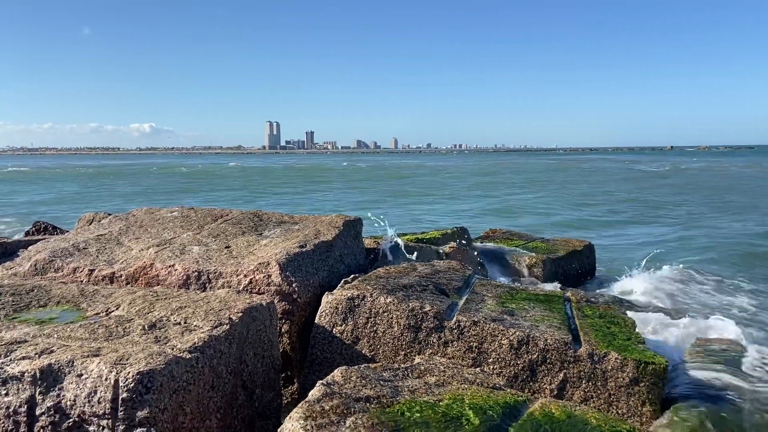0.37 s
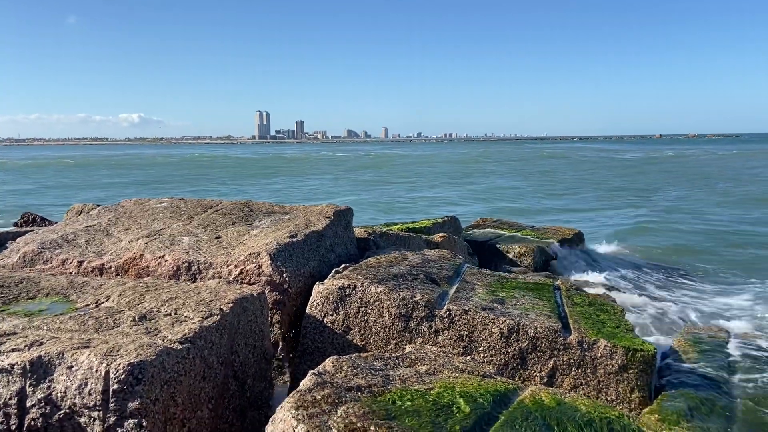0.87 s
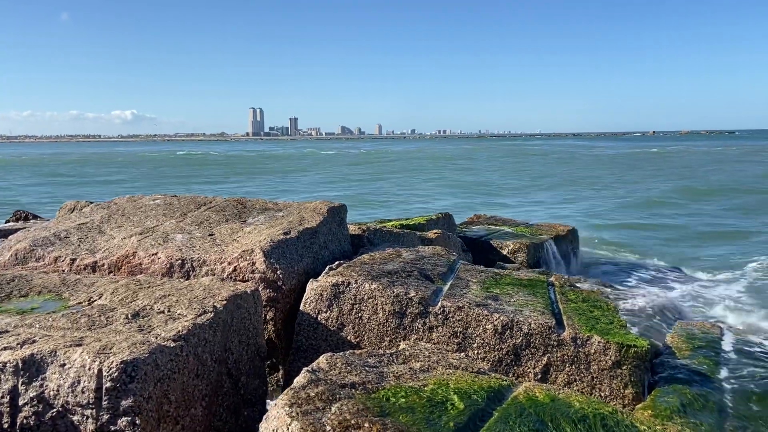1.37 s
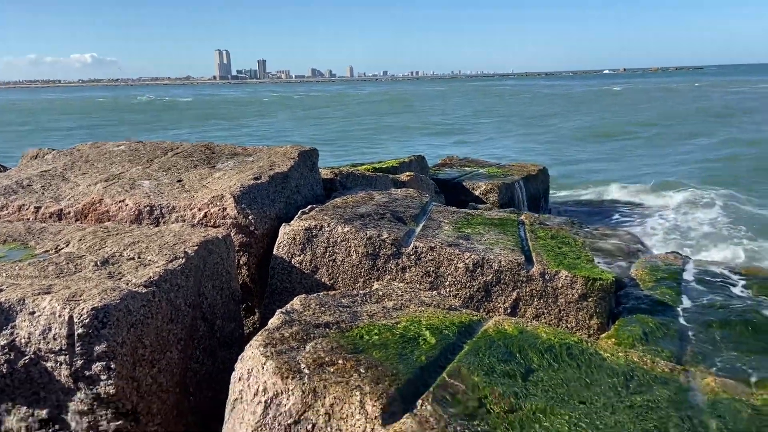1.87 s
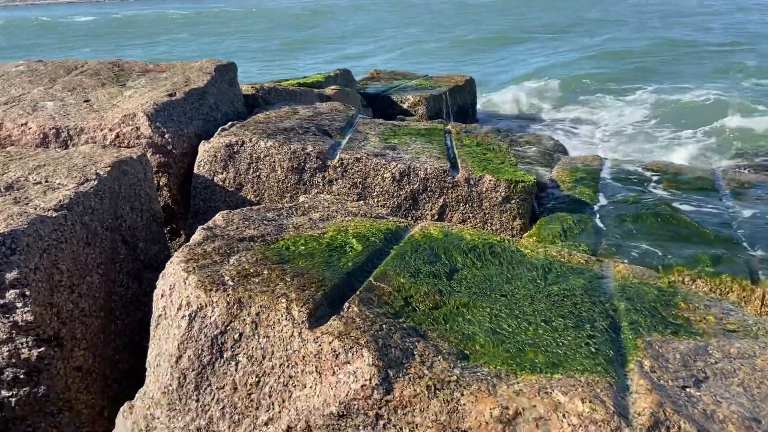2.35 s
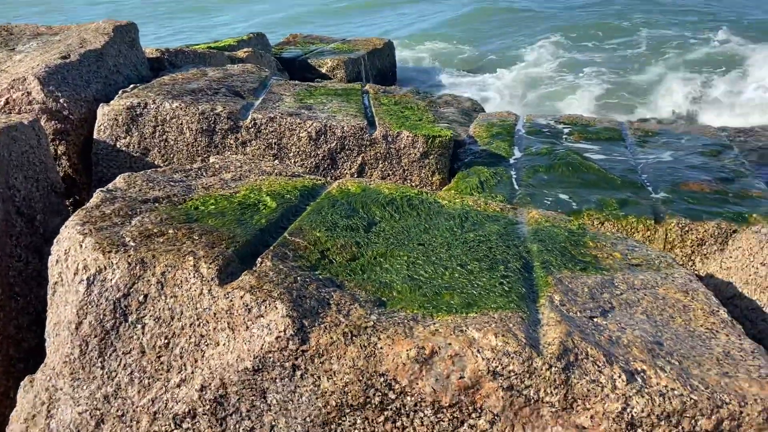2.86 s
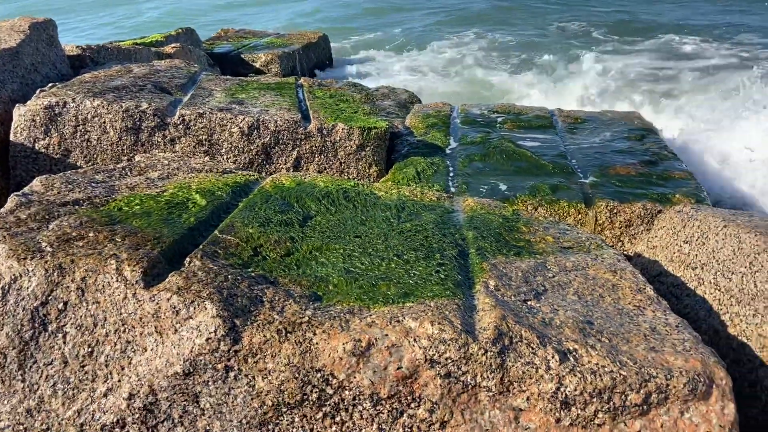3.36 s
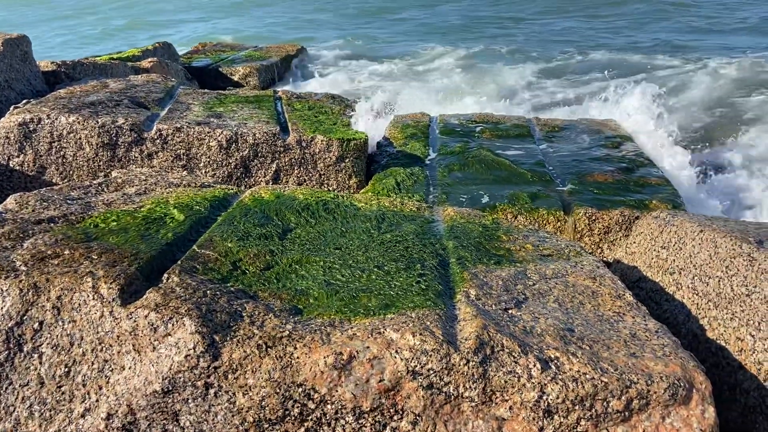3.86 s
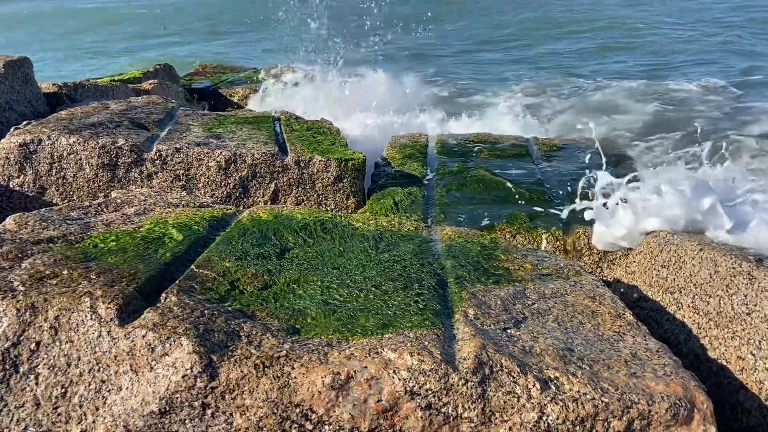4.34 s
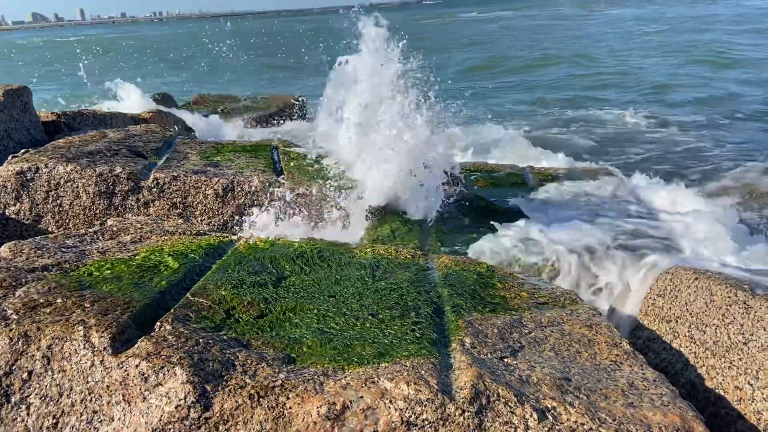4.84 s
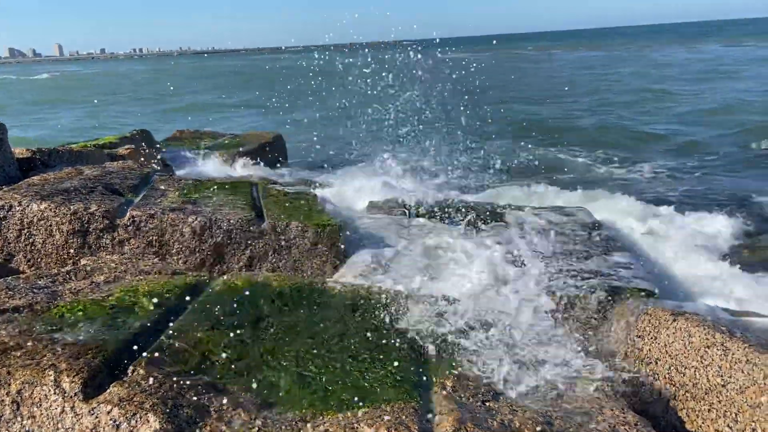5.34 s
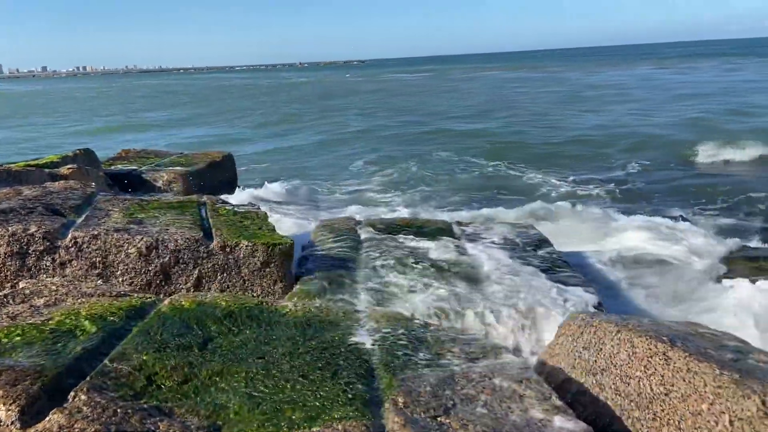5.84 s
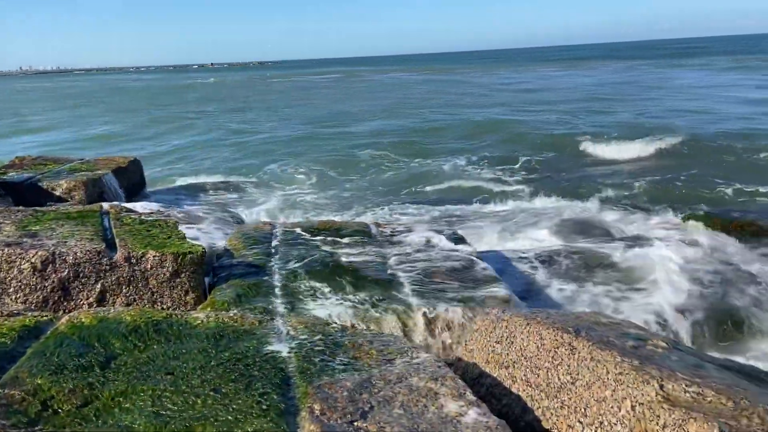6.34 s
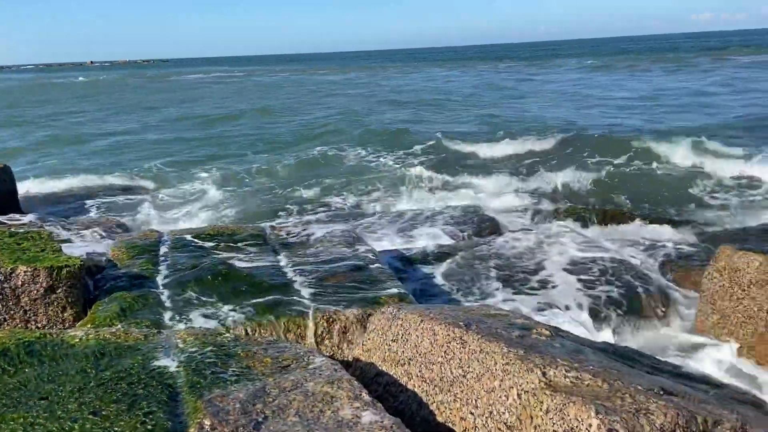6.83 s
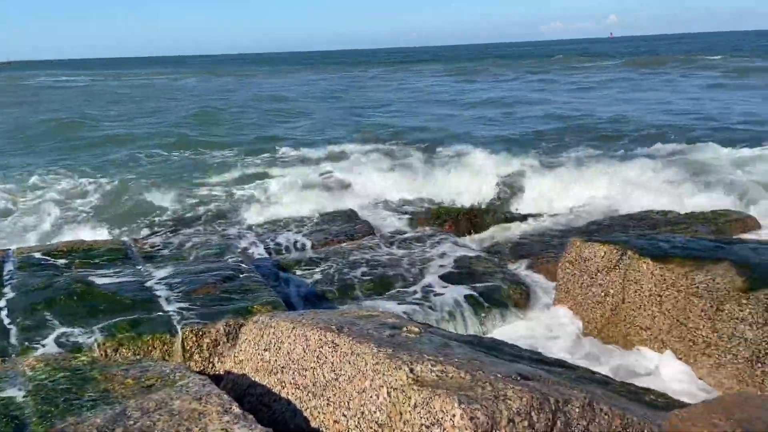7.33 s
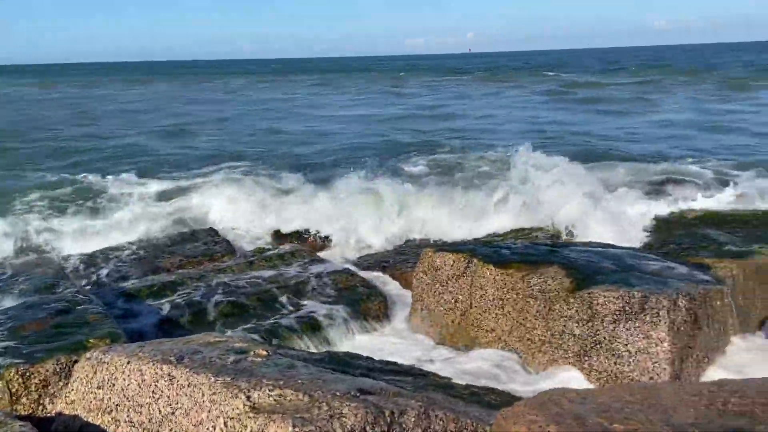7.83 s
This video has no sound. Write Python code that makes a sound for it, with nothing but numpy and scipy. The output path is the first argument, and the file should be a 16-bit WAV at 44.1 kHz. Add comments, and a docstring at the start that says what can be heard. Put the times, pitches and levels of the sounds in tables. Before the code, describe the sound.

On an open rocky jetty, surf hisses continuously in wide stereo, with faint spray patter and occasional bubbly gulps between the blocks. Strong wind hits the unprotected microphone throughout in short irregular bursts of low rumble, flutter and crackle, with thumps and sharp pops. Splashing brightens midway, peaks a little after five seconds, then eases into a broader wash as the wind keeps knocking.

```python
"""A rocky shore: waves wash over and splash against rock blocks while a strong gusty wind buffets two ports.
The surf is a wide hiss of random short-time spectra, with noise puffs and rising pings of falling spray
and the rings of air pockets. The wind is noise and small eddies in lumps, heard as rumble, flutter and
crackle, with soft thumps and sharp pops: pressure kicks dispersed so that they slide from high to low."""
import sys
import numpy as np
from scipy import signal
from scipy.fft import rfft, irfft, next_fast_len
from scipy.io import wavfile
from scipy.ndimage import uniform_filter1d

SR = 44100
rng = np.random.default_rng(int(sys.argv[2]) if len(sys.argv) > 2 else 0)


def attenuation_scalar(level_db):
    """Turn a level in dB into a linear amplitude multiplier (20 dB per decade)."""
    decades = np.asarray(level_db, float) / 20
    return 10 ** decades


def transcribe(u):
    """Save the signal u as a 16-bit wav file named by the first command-line argument.

    u: samples, shape (n,) or (channels, n), limited to [-1, 1]; the rate is SR.
    q: integer samples, one column per channel.
    """
    v = np.clip(np.atleast_2d(u).T, -1, 1)
    q = np.round(v * 32767).astype(np.int16)
    wavfile.write(sys.argv[1], SR, q)


N = 350595

# Water breaking on the near blocks, only its changes count: (time [s], spray hiss level [dB])
SURF_HISS = [(0.0, -38), (0.3, -39), (0.65, -40.5), (1.2, -41), (1.4, -39.5), (1.7, -41), (2.0, -39.5),
             (2.35, -40), (2.6, -37), (2.8, -38), (3.15, -34), (3.4, -38), (3.6, -35), (3.8, -38.5),
             (4.05, -36), (4.4, -38.5), (4.7, -36), (5.0, -38), (5.13, -35.5), (5.21, -34), (5.38, -32),
             (5.46, -36), (5.58, -33), (5.66, -36), (5.78, -35.5), (5.86, -38.5), (5.95, -40), (7.0, -41.5),
             (7.4, -39.5), (7.95, -39.5)]
# Waves tumbling farther out, heard in the body of the wash: (time [s], relative level [dB])
FAR_BREAKERS = [(0.0, 2.5), (0.35, 3), (0.65, 1.2), (2.3, 0), (4.4, -1), (5.0, 0.5), (5.23, 2), (5.5, -1.5),
                (5.8, 1.5), (6.0, -0.5), (6.6, 2.7), (7.0, 0.6), (7.4, 1.5), (7.95, 2.2)]
# Spectrum of the wash: (frequency [Hz], relative level [dB])
WASH_SPECTRUM = [(60, -30), (200, 3), (500, 8), (900, 9), (1500, 6.5), (2500, 2.5), (4000, -2), (5200, -1),
                 (6500, -4), (8000, -8.5), (11000, -11.5), (16000, -14.5)]
# Likeness of the wash at the two ports: (frequency [Hz], share [1 = alike])
WASH_LIKENESS = [(200, 1), (700, 0.62), (1800, 0.38), (3000, 0.27), (3900, 0.65), (5300, 0.52),
                 (6300, 0.58), (7200, 0.72), (8200, 1)]
# Drift of the left-right phase as the breakers move about: (frequency [Hz], rms phase [rad])
PHASE_WANDER = [(200, 1), (700, 0.24), (1800, 1.0), (3000, 0.35), (3900, 0), (5300, 1.0), (6300, 0.33),
                (7200, 0.73), (8200, 0.2)]
# Lead of the right port over the left: (frequency [Hz], lead [cycles])
RIGHT_LEAD = [(0, 0), (1500, .45), (2700, .85), (3800, .99), (5500, 1.5), (6400, 1.99), (7200, 2.01),
              (8900, 2.5), (11050, 3.0), (15200, 4.0), (19400, 5.0)]
# Big drops of spray slapping the rock: (time [s], relative level [dB])
SPRAY_SLAPS = [(4.7364, -29), (4.7716, -28), (4.812, -25), (5.3009, -32), (5.4685, -28), (5.665, -32),
               (5.7448, -47)]
# Air pockets gulped by the water between the blocks: (time [s], relative level [dB], nominal pitch [Hz])
AIR_POCKETS = [(0.4279, -29, 1630), (0.9238, -14, 1520), (1.4306, -20, 1460), (3.0629, -18, 1380),
               (3.366, -26, 1360), (3.857, -22, 1340), (5.2091, -28, 1620), (5.2999, -16, 2150),
               (5.3388, -24, 2390), (5.696, -25, 2430), (5.8561, -26, 1560), (6.976, -12, 1920),
               (7.3881, -28, 1950), (7.7059, -30, 1400), (7.7832, -27, 1610)]
# Steady strength of the wind between buffets: (time [s], level [dB])
STEADY_WIND = [(0.0, -24), (2.45, -24.5), (2.74, -15.5), (3.32, -34), (3.92, -29), (4.49, -26), (4.98, -28),
               (5.78, -24.5), (6.11, -22.5), (6.6, -14.5), (7.84, -25), (7.95, -11)]
# Moments when the steady wind drops out: (centre [s], half width [s], depth [dB])
WIND_LULLS = [(0.05, 0.036, -4), (1.03, .05, -5.5), (1.79, 0.028, -17), (2.47, 0.037, -8),
              (2.76, 0.026, -12), (3.175, .025, -14), (3.59, .02, -8), (3.86, .02, -10), (4.2, .02, -6),
              (4.565, 0.022, -10), (5.5, 0.02, -16), (5.73, .07, -12), (6.61, 0.027, -18),
              (7.09, 0.017, -12), (7.6, .02, -8), (7.86, .025, -6)]
# Buffets on the ports: (start [s], length [s], strength [dB], fineness [dB of flutter over rumble])
WIND_BUFFETS = [(0.101, 0.064, -20, 4), (0.211, 0.07, -26, 3), (0.45, 0.069, -27.5, -3),
                (0.589, 0.047, -17.5, -2), (0.793, 0.042, -22, -6.5), (1.092, 0.039, -17, -6),
                (1.165, 0.114, -25.5, -2), (1.268, 0.052, -24, -1), (1.39, 0.056, -23.5, 0),
                (1.523, 0.091, -21, -7.5), (1.677, 0.033, -31, -12), (1.834, 0.027, -17, -3),
                (1.924, 0.023, -22, -14), (1.984, 0.054, -18, -7), (2.104, 0.036, -21, -11),
                (2.19, 0.043, -34, -1), (2.25, 0.07, -32, -12), (2.362, 0.049, -17, -8.5),
                (2.523, 0.047, -13.5, -1), (2.794, 0.021, -18.5, -17), (2.843, 0.044, -20, -1),
                (2.941, 0.075, -17, -5.5), (3.046, 0.086, -21.5, -7.5), (3.211, 0.09, -16, -6),
                (3.328, 0.096, -19.5, -8), (3.49, 0.051, -19.5, -5), (3.634, 0.047, -16.5, 7),
                (3.683, 0.04, -25, -12), (3.764, 0.042, -18.5, 9), (3.897, 0.051, -16, 4.5),
                (4, 0.11, -19.5, 4), (4.15, 0.054, -27.5, -12), (4.231, 0.096, -16.5, -5),
                (4.39, 0.08, -25.5, -4.5), (4.6, 0.082, -23, 7), (4.761, 0.054, -20, 10.5),
                (4.783, 0.074, -35, -3), (4.893, 0.093, -28, 0), (5.018, 0.065, -28.5, 7),
                (5.095, 0.054, -23.5, 7), (5.144, 0.059, -23, -11), (5.32, 0.1, -31, -11),
                (5.436, 0.03, -22, -0.5), (5.836, 0.039, -18, -1.5), (5.95, 0.071, -22, 2.5),
                (6.13, 0.028, -19.5, 4), (6.247, 0.041, -25, -7), (6.33, 0.086, -23, 8.5),
                (6.428, 0.1, -24.5, 7), (6.641, 0.075, -21.5, 3), (6.733, 0.072, -24, 8),
                (6.923, 0.035, -17, -9), (6.96, 0.044, -22.5, 7), (7.185, 0.049, -15, -4),
                (7.266, 0.04, -22.5, -6), (7.317, 0.051, -24.5, -13), (7.355, 0.072, -15, -4),
                (7.49, 0.088, -21, -4), (7.64, 0.042, -28, 5), (7.716, 0.086, -13, -5),
                (7.884, 0.089, -18.5, -5)]
# Spectrum of the lowest wind layer: (frequency [Hz], relative level [dB])
RUMBLE_SPECTRUM = [(15, 3), (30, -6.5), (55, 6), (100, 3), (200, -9.5), (400, -19), (800, -82)]
# Spectrum of the middle wind layer: (frequency [Hz], relative level [dB])
FLUTTER_SPECTRUM = [(60, -1.5), (150, 4), (300, 1), (500, -3.5), (800, -14.5), (1500, -51)]
# Spectrum of the highest wind layer: (frequency [Hz], relative level [dB])
CRACKLE_SPECTRUM = [(200, -51), (450, -3), (700, 2), (1000, 0.5), (1500, -11.5), (2500, -23.5), (5000, -76)]
# Likeness of the wind at the two ports: (frequency [Hz], share [1 = alike])
WIND_LIKENESS = [(40, 0.77), (150, 0.69), (330, 0.5), (600, 0.12), (1000, 0.024)]
# Soft heavy thumps where a large eddy presses both ports: (time [s], level [dB])
EDDY_THUMPS = [(0.611, -14.5), (2.535, -7), (2.79, -15), (3.091, -12.5), (7.221, -8), (7.72, -20)]
# Sudden eddies on the ports:
# (time [s], level [dB], sharpness [dB, more crackle and less thump], left over right [dB])
EDDY_POPS = [(0.814, -10.5, 0.1, 6), (1.103, -14, 2, -0.5), (1.2, -13, 0.1, 6), (1.614, -12.5, -9, 2),
             (1.711, -10.5, -2, -3), (1.818, -20, -2, 0.0), (1.934, -10, -11, 4), (2.111, -14, 6, 2),
             (2.528, -2, -5, 0), (2.586, -7.5, -11, 5), (2.851, -7.5, -15, 13), (2.939, -18.5, 8.5, -0.5),
             (3.095, -13.5, -2, -0.5), (3.219, -9.5, 4.5, 1), (3.324, -15, 1, 5), (3.346, -17, 0.1, -8),
             (3.407, -18, 8, 0), (3.426, -11, 4, 1), (3.636, -9.5, 7.5, 0.0), (3.764, -26, -7, -0.5),
             (3.783, -4.5, -4, 4), (3.813, -19, -1, 7), (3.863, -16.5, 6.5, 3), (3.898, -33, -2, -2.0),
             (3.92, -11, -6, -3), (4.031, -5, -8, 5.5), (4.088, -7, 0.1, 1), (4.173, -23, 4, 0.5),
             (4.302, -4.5, 0.5, -2), (4.752, -13, -6, 5), (5.046, -15, 5, 1), (5.117, -8.5, 5, -2),
             (5.978, -12, 2, 3), (6.072, -14, 1, 1.5), (6.124, -17, 2, -2), (6.178, -7, -4, 0),
             (6.269, -11.5, -8, 3), (6.297, -16, -6, 0.5), (6.343, -13, 3, -1), (6.437, -11, -6, -4),
             (6.454, -11, 2, -3), (6.636, -9, -5, 2), (6.67, -12.5, 5, -2), (6.711, -18.5, 0.1, 4),
             (6.782, -6.5, 5.5, 1), (6.807, -5.5, 7, 0), (6.913, -18, -18, 1), (6.929, -9.5, -4, 9),
             (7.018, -11, 2.5, -3), (7.032, -4, -1, 3), (7.166, -11.5, 1, -4), (7.217, -12, -1, 5),
             (7.479, -23, -5, -1.5), (7.547, -6.5, -11.5, -1), (7.656, -13, -10, 0)]
# Edge below which both sides sound the same: (time [s], frequency [Hz])
MONO_EDGE = [(0, 334), (1.0, 323), (1.3, 245), (2.6, 219), (3.1, 128), (3.5, 70), (4.0, 25), (7.95, 25)]
# Hollow in the centre of the image at first: (centre [Hz], width [Hz], level [dB], end [s])
CENTRE_HOLLOW = (663, 127, -6, 1.35)

BODY_FOLLOWS = 0.6  # dB that the body of the wash gains per dB of hiss
RISE_DB_PER_S, FALL_DB_PER_S = 435, 364  # swell of a buffet before its start, decay after its end
STEADY_RUMBLE_DB, STEADY_FLUTTER_DB = -4.5, -9  # the steady wind's share in each layer
RUMBLE_DB, FLUTTER_DB = -5, -3.5  # a buffet's share in each layer at fineness 0
CRACKLE_DB, CRACKLE_FOLLOWS = -35.5, 0.49  # crackle at a flutter of -30 dB, and dB gained per dB of flutter
RUMBLE_LAG_S = 0.016  # the bass of the wind arrives after its flutter
THUMP_DB, FLAP_DB, SNAP_DB = -20, -2.5, -3.5  # low, middle and high part of a pop at sharpness 0
RAGGED = 0.14  # share of a pop's ragged tail
POP_DELAY_S = 0.003  # delay of every pop after its listed time


def evened(x):
    """Normalisation: scales to rms 1."""
    return x / np.sqrt(np.mean(x ** 2) + 1e-20)


def read(points, hz):
    """Interpolation of a spectrum table on a logarithmic frequency axis."""
    f, value = np.transpose(points)
    return np.interp(np.log(hz + 1), np.log(f + 1), value)


def lumps(hz):
    """Band-limited random modulation of rms 1, its fluctuations strongest near the given rate."""
    f = np.fft.rfftfreq(N, 1 / SR)
    shape = f / (f + hz / 4) / (1 + (f / hz) ** 2)
    return evened(irfft(rfft(rng.standard_normal(N)) * shape, N))


def swept(x, colour, cycles=1.4):
    """Dispersion: a delay of about a fixed number of cycles per frequency makes a click slide downwards."""
    size = next_fast_len(x.shape[-1])
    hz = np.fft.rfftfreq(size, 1 / SR)
    phase = 2 * np.pi * cycles * (np.log(hz + 8) - hz / 800)  # hardly any delay near 800 Hz
    spectrum = rfft(x, size) * attenuation_scalar(read(colour, hz)) * np.exp(-1j * phase)
    return irfft(spectrum, size)[..., :x.shape[-1]]


def two_ports(a, b, same):
    """Partial coherence: two unrelated signals become two channels alike by the share same(Hz)."""
    share = np.clip(read(same, np.fft.rfftfreq(N, 1 / SR)), 0, 1)
    mid = rfft(a) * np.sqrt(1 + share)
    side = rfft(b) * np.sqrt(1 - share)
    return irfft(np.array([mid + side, mid - side]), N) / np.sqrt(2)


def wash():
    """Superposition of countless bursting bubbles: random short-time spectra with patches and flicker."""
    hop = 128
    frames, hz = N // hop + 8, np.fft.rfftfreq(512, 1 / SR)
    start = np.arange(frames) * hop
    t = start / SR
    a, b, c, d, patches, flicker, drift = rng.standard_normal((frames, 257, 7)).T

    # smoothing over (frequency bins, then frames)
    drift = evened(uniform_filter1d(uniform_filter1d(drift, 5, 0), 40, 1))
    drift = read(PHASE_WANDER, hz)[:, None] * drift
    patches = evened(uniform_filter1d(uniform_filter1d(patches, 7, 0), 12, 1))
    flicker = evened(uniform_filter1d(uniform_filter1d(flicker, 120, 0), 5, 1))

    same = np.clip(read(WASH_LIKENESS, hz), 0, 1)[:, None]
    left = a + 1j * b
    right = same * left * np.exp(1j * drift) + np.sqrt(1 - same ** 2) * (c + 1j * d)

    s, hiss_db = np.transpose(SURF_HISS)
    hiss = np.interp(t, s, hiss_db - hiss_db.mean())
    hiss = hiss + 0.5 * lumps(3.2)[np.minimum(start, N - 1)]  # the foam surges and sags
    body = BODY_FOLLOWS * hiss + np.interp(t, *np.transpose(FAR_BREAKERS))
    # 0 in the body of the wash, about 1 in the hiss
    bright = np.clip(np.log2(hz / 2200 + 1e-9) / 0.77, 0, 1.2)[:, None]
    level_db = read(WASH_SPECTRUM, hz)[:, None] + 0.95 * patches + 0.91 * flicker
    level_db = level_db + bright * hiss + (1 - bright) * body
    foam = np.array([left, right]) * attenuation_scalar(level_db)
    return evened(signal.istft(foam, nperseg=512, noverlap=384)[1][:, :N])


def spray():
    """Impact noise and bubble resonance: big drops puff brightly, small ones ping, louder with the hiss."""
    out = np.zeros(N)
    u = np.arange(600) / SR / 0.002
    for (s, db), burst in zip(SPRAY_SLAPS, rng.standard_normal((len(SPRAY_SLAPS), 600))):
        puff = np.diff(burst, prepend=0) * u * np.exp(-u)
        out[round(s * SR):][:600] += attenuation_scalar(db) * puff

    s, hiss_db = np.transpose(SURF_HISS)
    fall = attenuation_scalar(2.5 * (np.interp(np.arange(N) / SR, s, hiss_db) - hiss_db.max()))
    size = fall * attenuation_scalar(2.7 * np.minimum(rng.exponential(1, N), 4) - 33)
    size = size * (rng.random(N) < 300 / SR)  # about 300 drops per second
    kind = rng.integers(0, 24, N)
    for k, hz in enumerate(np.geomspace(800, 6500, 24)):
        turns = hz * np.arange(1024) / SR
        ping = np.sin(2 * np.pi * turns * (1 + 0.015 * turns)) * turns * np.exp(-turns / 2.5)
        out += signal.oaconvolve(size * (kind == k), ping)[:N]
    return out


def bubbles():
    """Volume resonance of air pockets: each rings a dozen cycles, rising as it nears the surface."""
    out = np.zeros(N)
    for s, db, hz in AIR_POCKETS:
        turns = hz * np.arange(2048) / SR
        ring = np.sin(2 * np.pi * turns * (0.945 + 0.0025 * turns)) * turns / 4 * np.exp(1 - turns / 4)
        out[round(s * SR):][:2048] += attenuation_scalar(db - 0.5) * ring
    return out


def surf():
    """Phase difference between the ports: wash, spray and bubbles together, the right port leading."""
    water = attenuation_scalar(-29) * wash() + spray() + bubbles()
    lead_cycles = np.interp(np.fft.rfftfreq(N, 1 / SR), *np.transpose(RIGHT_LEAD))
    right = irfft(rfft(water[1]) * np.exp(2j * np.pi * lead_cycles), N)
    return np.array([water[0], right])


def gusts():
    """Addition of powers: steady wind plus buffets that swell, hold and die away, as levels per layer."""
    t = np.arange(0, N / SR + 0.002, 0.002)
    start, length, db, fine_db = np.transpose(WIND_BUFFETS)[:, :, None]
    swell_db = RISE_DB_PER_S * np.maximum(start - t, 0)
    decay_db = FALL_DB_PER_S * np.maximum(t - start - length, 0)
    held_db = db - swell_db - decay_db

    centre, half, depth_db = np.transpose(WIND_LULLS)[:, :, None]
    lull_db = (depth_db * np.exp(-((t - centre) / half) ** 2)).sum(0)
    steady_db = np.interp(t, *np.transpose(STEADY_WIND)) + lull_db

    rumble = attenuation_scalar(steady_db + STEADY_RUMBLE_DB) ** 2
    rumble = rumble + (attenuation_scalar(held_db + RUMBLE_DB - fine_db / 2) ** 2).sum(0)
    flutter = attenuation_scalar(steady_db + STEADY_FLUTTER_DB) ** 2
    flutter = flutter + (attenuation_scalar(held_db + FLUTTER_DB + fine_db / 2) ** 2).sum(0)
    rumble_db, flutter_db = 10 * np.log10([rumble, flutter])
    crackle_db = CRACKLE_DB + CRACKLE_FOLLOWS * (flutter_db + 30)
    now = np.arange(N) / SR
    return (np.interp(now - RUMBLE_LAG_S, t, rumble_db), np.interp(now, t, flutter_db),
            np.interp(now, t, crackle_db))


def buffeting():
    """Turbulence: noise in lumps plus scattered small eddies, each port partly on its own."""
    rumble_db, flutter_db, crackle_db = gusts()
    slow, fast = lumps(20.0), lumps(35)
    eddies = rng.choice([-1., 1.], (2, N)) * (rng.random((2, N)) < 200 / SR)  # about 200 per second
    eddies *= attenuation_scalar(3.1 * np.minimum(rng.exponential(1, (2, N)), 4))
    noise = rng.standard_normal((3, 2, N))
    gritty = 0.62 * noise[1] + evened(eddies)
    low = two_ports(*noise[0] * attenuation_scalar(3.0 * slow + 1.45 * fast), WIND_LIKENESS)
    high = two_ports(*gritty * attenuation_scalar(2.3 * slow + 2.73 * fast), WIND_LIKENESS)
    # the smallest swirls lead their own life
    fine = two_ports(*noise[2] * attenuation_scalar(3.8 * lumps(60)), WIND_LIKENESS)
    rumble = evened(swept(low, RUMBLE_SPECTRUM)) * attenuation_scalar(rumble_db)
    flutter = evened(swept(high, FLUTTER_SPECTRUM)) * attenuation_scalar(flutter_db)
    crackle = evened(swept(evened(high) + 0.76 * evened(fine), CRACKLE_SPECTRUM)) * attenuation_scalar(crackle_db)
    return rumble + flutter + crackle


def thumps():
    """Impulse response: each large eddy is one slow pressure kick, the same on both ports."""
    lead = 1024  # room for the frequencies that arrive early
    impulse = np.eye(1, 8192, lead)[0]
    kick = swept(impulse, RUMBLE_SPECTRUM) + 0.5 * swept(impulse, FLUTTER_SPECTRUM)
    kicks = np.zeros(N)
    s, db = np.transpose(EDDY_THUMPS)
    kicks[np.round(s * SR).astype(int)] = attenuation_scalar(db)
    return signal.oaconvolve(kicks, kick / abs(kick).max())[lead:N + lead]


def pops():
    """Dispersed impulse: each eddy is a pressure kick on both ports and a ragged tail differing between them."""
    lead = 1024  # room for the frequencies that arrive early
    out, t = np.zeros((2, N + 8192)), np.arange(6144) / SR
    ragged = rng.standard_normal((len(EDDY_POPS), 2, len(t)))
    for (s, db, sharp_db, pan_db), rag in zip(EDDY_POPS, ragged):
        kick = np.zeros((2, lead + len(t)))
        kick[:, lead:] = RAGGED * rag * np.exp(-t / 0.005)
        kick[:, lead] += np.sign(rag[0, -1])  # push or pull at random
        thump = swept(kick.mean(0), RUMBLE_SPECTRUM)
        flap = swept(kick, FLUTTER_SPECTRUM)
        snap = swept(kick, CRACKLE_SPECTRUM)
        sound = attenuation_scalar(THUMP_DB - sharp_db) * thump / abs(thump).max()
        sound = sound + attenuation_scalar(FLAP_DB) * flap / abs(flap).max()
        sound = sound + attenuation_scalar(SNAP_DB + sharp_db) * snap / abs(snap).max()
        sides = attenuation_scalar([[pan_db / 2], [-pan_db / 2]])
        out[:, round((s + POP_DELAY_S) * SR):][:, :kick.shape[1]] += attenuation_scalar(db) * sides * sound
    return out[:, lead:N + lead]


def scene():
    """Superposition: surf outside, wind on the ports."""
    return surf() + buffeting() + thumps() + pops()


def roll_off(x):
    """The treble ends steeply here."""
    return signal.sosfilt(signal.butter(12, 17080, fs=SR, output="sos"), x)


def record(dry):
    """Filtering and saturation: low cut, soft overload, common bass below a sinking edge, hollow, band limit."""
    dry = signal.sosfilt(signal.butter(3, 32, "high", fs=SR, output="sos"), dry)
    left, right = 0.95 * np.tanh(dry / 0.95)
    middle_and_side = np.array([left + right, left - right]) / 2
    hz, t, (mid, side) = signal.stft(middle_and_side, SR, nperseg=4096, noverlap=3072)
    side /= 1 + (np.interp(t, *np.transpose(MONO_EDGE)) / (hz[:, None] + 1)) ** 7.0

    centre_hz, width_hz, dip_db, until = CENTRE_HOLLOW
    bell = np.exp(-((hz[:, None] - centre_hz) / width_hz) ** 2)
    mid *= attenuation_scalar(dip_db * bell * np.clip((until - t) / 0.2, 0, 1))  # fades over the last 0.2 s

    pair = signal.istft(np.array([mid + side, mid - side]), nperseg=4096, noverlap=3072)[1][:, :N]
    band_limit = signal.firwin(511, 15800, window=("kaiser", 9), fs=SR)  # low-pass edge in Hz
    pair = signal.oaconvolve(pair, band_limit[None], "same")
    return roll_off(pair)


dry = scene()
out = record(dry)
transcribe(out)
```